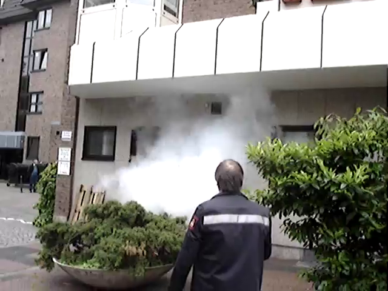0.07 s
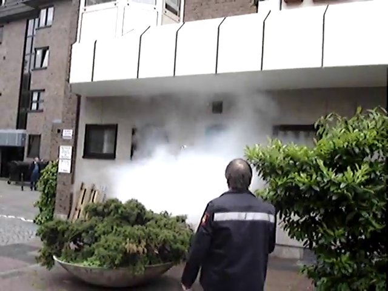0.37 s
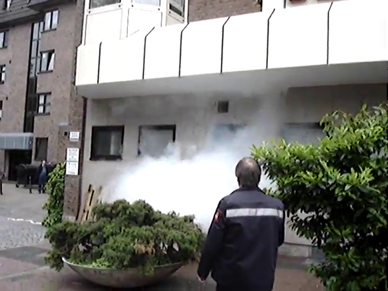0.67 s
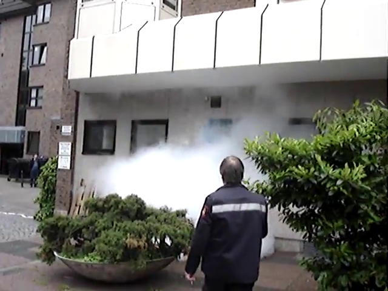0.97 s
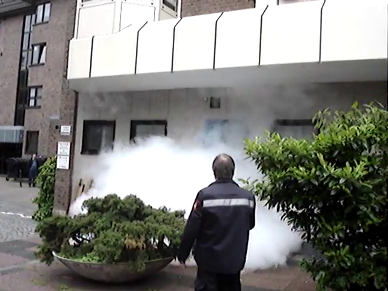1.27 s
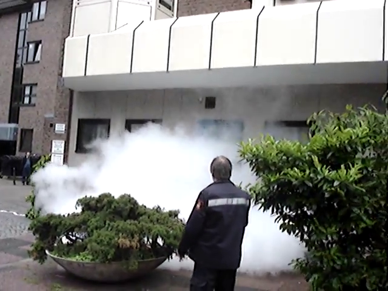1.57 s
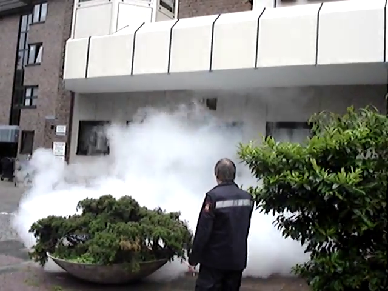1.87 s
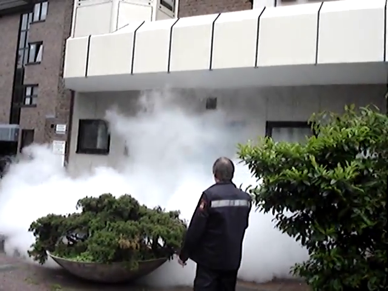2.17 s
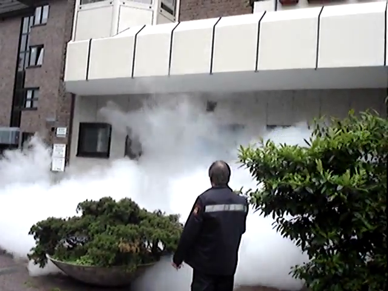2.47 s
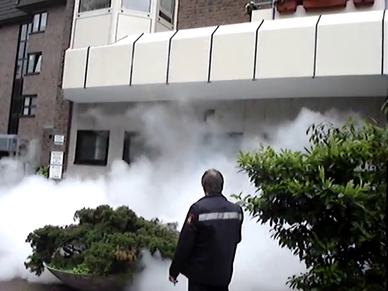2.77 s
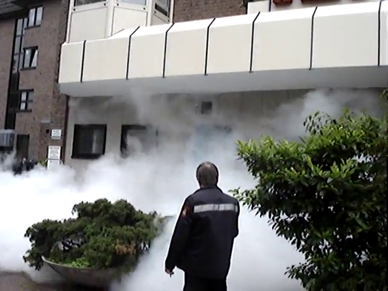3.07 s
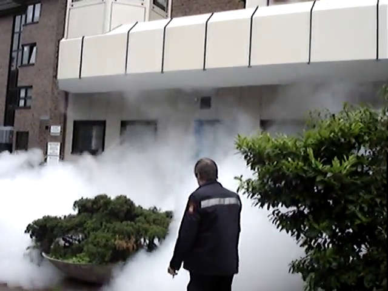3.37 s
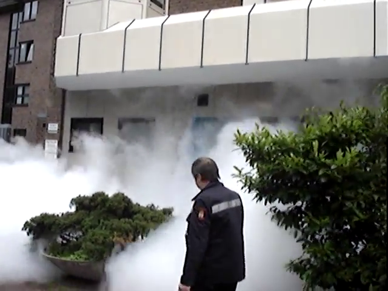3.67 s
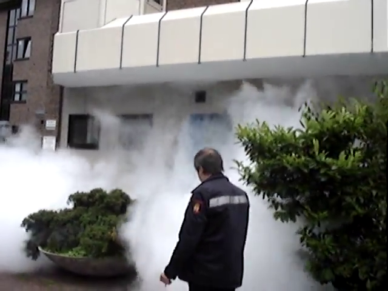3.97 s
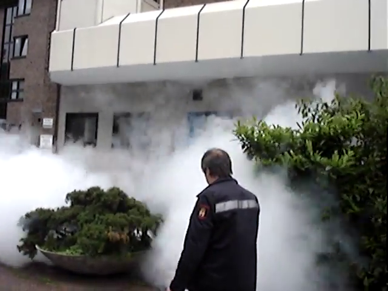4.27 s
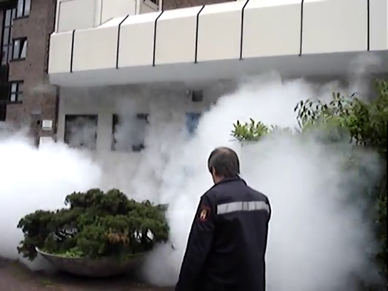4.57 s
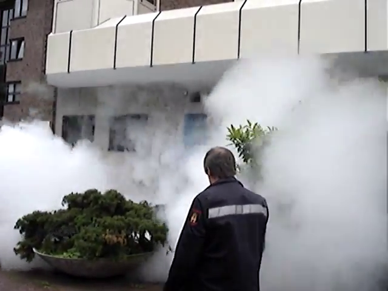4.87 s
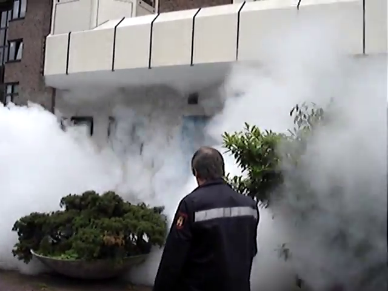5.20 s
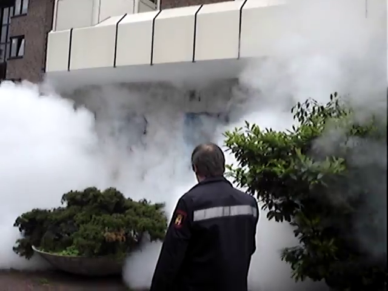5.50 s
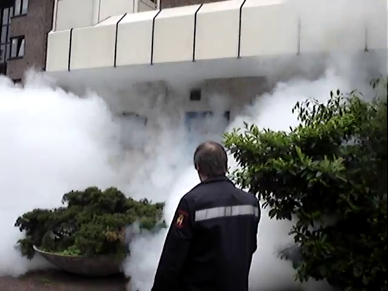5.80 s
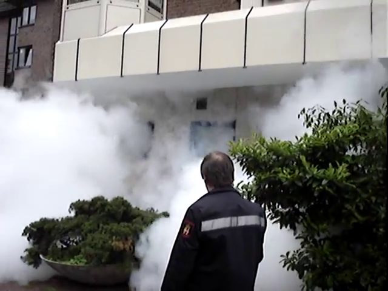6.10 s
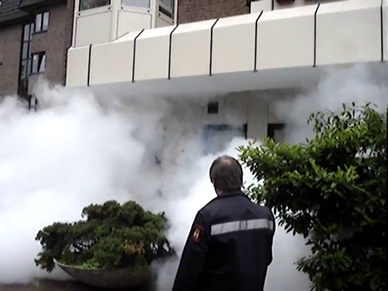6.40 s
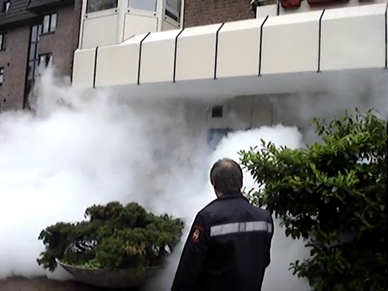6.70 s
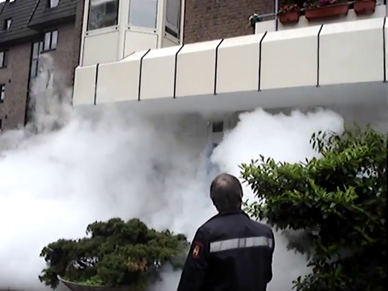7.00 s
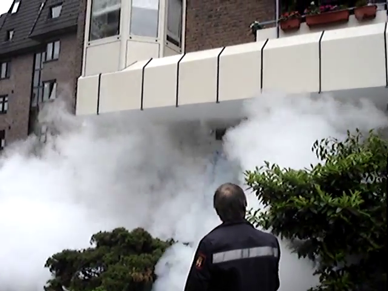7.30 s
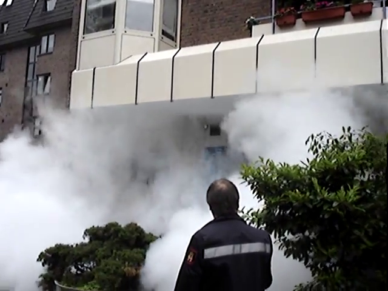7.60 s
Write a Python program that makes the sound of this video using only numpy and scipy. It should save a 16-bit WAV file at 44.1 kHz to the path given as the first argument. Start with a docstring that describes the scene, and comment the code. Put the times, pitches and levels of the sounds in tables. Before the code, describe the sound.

A soft microphone thump opens straight into the loud, continuous rush of gas escaping from a pipe outdoors. A harsh hiss and a flickering, finely crackling spray sit on top, while a hollow roar rings in a recess under a balcony. Small swells and brief whooshes come and go in the steady flow, heard from a few metres away with dull reflections off nearby walls.

```python
"""A loud, sputtering hiss over a hollow roar, opening with the soft thump of a microphone switching on.
Cold gas vents from a pipe at the foot of a building, under a balcony, a few metres away.
The jet hisses at the outlet, crackles with flashing droplets and roars where the plume breaks up.
The plume rings a recess in the facade; close walls and paving add dull echoes."""
import sys
import numpy as np
from scipy.fft import rfft, irfft, next_fast_len
from scipy.io import wavfile
from scipy.ndimage import map_coordinates

SR = 44100
rng = np.random.default_rng(int(sys.argv[2]) if len(sys.argv) > 2 else 0)


def persist_wave(psi):
    """Save psi, clipped to +-1, as 16-bit WAV."""
    counts = np.round(np.clip(psi, -1, 1) * 32767).astype(np.int16)
    wavfile.write(sys.argv[1], SR, np.atleast_2d(counts).T)


N = 337365
TIME_S = np.arange(N) / SR


def amp(db):
    """Decibels to gain."""
    return 10 ** (np.asarray(db) / 20)


def unit(x):
    """Scale to rms 1."""
    return x / np.sqrt(np.mean(x ** 2) + 1e-20)


def curve(points):
    """(t/s, value) points, interpolated per sample."""
    return np.interp(TIME_S, *np.transpose(points))


def bell(middle_s, length_s):
    """Gaussian swell, peak 1."""
    return np.exp(-(2 * (TIME_S - middle_s) / length_s) ** 2)


def wobble(knots_per_s):
    """Smooth random curve."""
    return map_coordinates(rng.standard_normal(4096), [TIME_S * knots_per_s], mode="wrap")


def filtered(x, response):
    """Apply a complex frequency response."""
    size = next_fast_len(N + 8192)
    return irfft(rfft(x, size) * response(np.fft.rfftfreq(size, 1 / SR)), size)[:N]


def turbulence(spectrum, crackle=0):
    """Noise plus any crackle, shaped by (f/Hz, level/dB) points; rms 1."""
    f_hz, level_db = np.transpose(spectrum)
    shape = lambda hz: amp(np.interp(np.log(hz + 1), np.log(f_hz), level_db))
    return unit(filtered(rng.standard_normal(N) + crackle, shape))


def resonating(modes):
    """Noise rings each (f/Hz, width/Hz, level/dB) mode; the sum has rms 1."""
    total = np.zeros(N)
    for f_hz, width_hz, db in modes:
        band = lambda hz: (2j * hz * width_hz / (f_hz ** 2 - hz ** 2 + 2j * hz * width_hz)) ** 2
        total += amp(db) * filtered(rng.standard_normal(N), band)
    return unit(total)


def drive(layer):
    """A layer's gain follows the gas flow and its surges, and drifts a little."""
    # layer response: level/dB, dB per flow dB, dB per surge dB, drift/dB
    layers = { "boom": (-29, 0.44, 0.5, 0.94), "howl": (-29, -0.12, .5, 0.63),
              "roar": (-27.5, 0.88, 2, 0.42), "rush": (-27, 1.1, -0.56, 0.65),
              "deep hiss": (-22.5, .35, 0.3, 0.4), "bright hiss": (-20.5, 0.18, -1.5, 0.33),
              "spray": (-22, -0.12, 0.3, 0.65), }
    # gas flow: t/s, level/dB
    flow = [(0.05, 2), (0.48, 3), (0.82, 1.5), (1.23, 3), (1.88, -0.2), (1.93, 1.7), (2.3, 2.5),
            (2.47, -0.5), (3.02, 1), (3.2, -3.5), (3.85, -1), (4.61, -0.3), (5.09, 0.9), (5.29, -3.2),
            (5.8, -1.5), (6.82, 0.5), (7.26, -0.6), (7.65, -0.2)]
    # surges (roar swells, hiss dulls): middle t/s, length/s, level/dB
    surges = [(0.34, 0.13, 1.4), (0.74, 0.11, 1.5), (0.99, 0.25, 2.1), (1.29, 0.19, 1), (2.006, 0.27, 1.2),
              (2.68, 0.66, 1.5), (3.78, 0.19, 1.0), (4.162, 0.19, 0.7), (4.71, 0.25, 1.4),
              (5.59, 0.41, 1.4), (6.22, 0.14, 0.6), (6.62, 0.19, 0.7), (7.41, 0.35, 1.9)]
    level_db, per_flow, per_surge, drift_db = layers[layer]
    surge_db = sum(db * bell(middle_s, length_s) for middle_s, length_s, db in surges)
    return amp(level_db + per_flow * curve(flow) + per_surge * surge_db + drift_db * wobble(11))


def droplets(rate_per_s, level_db):
    """Droplets flash to vapour: a fine crackle."""
    pops = (rng.random(N) < rate_per_s / SR) * rng.standard_normal(N)
    return amp(level_db) * unit(pops)


def hiss(crackle):
    """Fast gas at the outlet, now deeper, now brighter; starts louder and settles."""
    # deep hiss spectrum: f/Hz, level/dB
    deep_spectrum = [(1300, -41), (1900, -12), (2320, -0.5), (2600, -1.5), (2900, 0.5), (3400, -3.5),
                     (4300, -9.5), (6000, -27)]
    # bright hiss spectrum: f/Hz, level/dB
    bright_spectrum = [(2000, -25.5), (2900, -9.5), (3400, -2), (3900, -1.5), (4700, -3), (5600, -9),
                       (8000, -34)]
    opening_db, settle_s = 3.5, 0.22
    deep = drive("deep hiss") * turbulence(deep_spectrum, crackle)
    bright = drive("bright hiss") * turbulence(bright_spectrum, crackle)
    return amp(opening_db * np.exp(-TIME_S / settle_s)) * (deep + bright)


def spray(crackle):
    """Fine spray at the outlet flickers in the treble."""
    # spray spectrum: f/Hz, level/dB
    spectrum = [(3000, -27.5), (4500, -13), (5400, 0.5), (6200, 2), (7200, 0.5), (8400, -4.5), (9900, -6)]
    # spray strength: t/s, level/dB
    level = [(0.05, -1), (0.95, -1.3), (1.66, 1), (2.76, -1), (3.12, 1), (3.84, -0.3), (5.24, -1),
             (5.31, -1.5), (7.03, -0.8), (7.65, -2)]
    return drive("spray") * amp(curve(level) + 0.83 * wobble(75)) * turbulence(spectrum, crackle)


def roar():
    """Large eddies roar and ring the recess; for a while two hollow modes yield to one between them."""
    # eddy spectrum: f/Hz, level/dB
    spectrum = [(20, -21), (32, -22), (46, -32.5), (145, -27.5), (250, -8), (385, -15), (600, -0.5),
                (870, -5.5), (1100, -4), (1500, -9), (3000, -48)]
    # hollow recess modes: f/Hz, width/Hz, level/dB
    pair = [(727, 99, 0.91), (1002, 124, -2)]
    # mode between them: f/Hz, width/Hz, level/dB
    between = [(864, 143, 0)]
    # crossfade to that mode: t/s, share/0-1
    crossfade = [(3.1, 0.1), (3.5, 0.98), (4.2, 0.77), (4.7, 0.0039)]
    share = curve(crossfade)
    hollow = np.sqrt(1 - share) * resonating(pair) + np.sqrt(share) * amp(1.5) * resonating(between)
    return drive("roar") * (amp(-5.5 - 2.2 * share) * turbulence(spectrum) + amp(-1.7) * hollow)


def boom():
    """The plume rings the low modes of the recess."""
    # low modes: f/Hz, width/Hz, level/dB
    modes = [(109.6, 21.5, -12.5), (229.6, 54, -6), (289.4, 48.5, 2), (344, 37, -1)]
    # boom strength: t/s, level/dB
    level = [(0.05, 0), (1.03, 0.1), (2.21, -1.4), (2.85, -0.2), (3.47, -1.5), (4.57, 0.5), (5.59, -2),
             (6.59, 1.0), (7.65, 1.5)]
    return drive("boom") * amp(curve(level)) * resonating(modes)


def howl():
    """The plume rings the middle modes of the recess."""
    # middle modes: f/Hz, width/Hz, level/dB
    modes = [(420.4, 18.5, -3), (469.6, 44, -1), (547, 50, 0.5)]
    # howl strength: t/s, level/dB
    level = [(0.05, -1.5), (1.15, 4), (1.83, -2.5), (2.86, 1.1), (3.24, -0.3), (3.82, 3.6), (4.29, 2.4),
             (5.12, -3.0), (7.65, -1.8)]
    return drive("howl") * amp(curve(level)) * resonating(modes)


def rush():
    """Smaller eddies rush above the roar."""
    # small-eddy spectrum: f/Hz, level/dB
    spectrum = [(600, -25), (1100, -5.5), (1450, -0.5), (1680, -3), (1950, 1.5), (2250, -3), (3200, -24)]
    return drive("rush") * turbulence(spectrum)


def whooshes():
    """Bands of turbulence swell and fade; the narrowest hoot."""
    # gas swells: middle t/s, length/s, f/Hz, width/Hz, level/dB
    swells = [(.08, 0.22, 140, 70, -36.5), (.19, .5, 2270, 600, -22.5), (1.06, .17, 1070, 220, -27),
              (1.26, .2, 2920, 500, -23.5), (2.06, .37, 6340, 1280, -28), (3.84, 0.11, 535, 50, -26),
              (4.15, .12, 510, 50, -27), (4.443, .11, 4000, 1600, -26), (4.81, 0.19, 2530, 1600, -18.5),
              (5.12, .24, 4600, 1600, -23), (5.54, 0.22, 2710, 550, -21), (5.88, .13, 3500, 1600, -23),
              (6.377, .15, 3900, 1400, -24.5), (6.81, 0.24, 3100, 1600, -21.5),
              (7.486, .45, 2440, 900, -24), (7.5, .25, 200, 110, -33.5)]
    return sum(amp(db) * bell(middle_s, length_s) * resonating([(f_hz, width_hz, 0)])
               for middle_s, length_s, f_hz, width_hz, db in swells)


def echoes(jet):
    """Close walls and paving return dull echoes that waver in the drifting fog."""
    # hard surfaces: delay/ms, level/dB
    walls = [(2.1, -25.5), (2.74, -26), (3.9, -22), (6.1, -23.5)]
    cutoff_hz, fog_db, fog_per_s = 3600, 1, 1.5
    total = np.zeros(N)
    for delay_ms, db in walls:
        path = lambda hz: np.exp(-2j * np.pi * hz * delay_ms / 1000) / (1 + (hz / cutoff_hz) ** 4)
        total += amp(db + fog_db * wobble(fog_per_s)) * filtered(jet, path)
    return total


def scene():
    """The uneven mix of liquid and gas makes the whole jet sputter."""
    sputter_db = 0.43 * wobble(32) + 0.43 * wobble(90)
    crackle = droplets(rate_per_s=1500, level_db=-12.5)
    outlet = hiss(crackle) + spray(crackle) + whooshes()
    plume = roar() + boom() + howl() + rush()
    jet = amp(sputter_db) * outlet + amp(1.1 * sputter_db) * plume
    return (jet + echoes(jet))[None]


def record(dry):
    """The microphone switches on, thumps as its bias settles, rounds peaks and limits the band."""
    on_s, rise_s, settle_s = 0.043, 0.0011, 0.04
    ceiling, top_hz = 0.92, 10150
    age_s = np.maximum(TIME_S - on_s, 0)
    thump = amp(-17) * np.exp(-age_s / settle_s)
    live = (1 - np.exp(-age_s / rise_s)) * (dry[0] + thump)
    rounded = live / (1 + (np.abs(live) / ceiling) ** 8) ** (1 / 8)
    return filtered(rounded, lambda hz: np.clip((top_hz - hz) / 200, 0, 1) ** 2)[None]


dry = scene()
out = record(dry)
persist_wave(out)
```